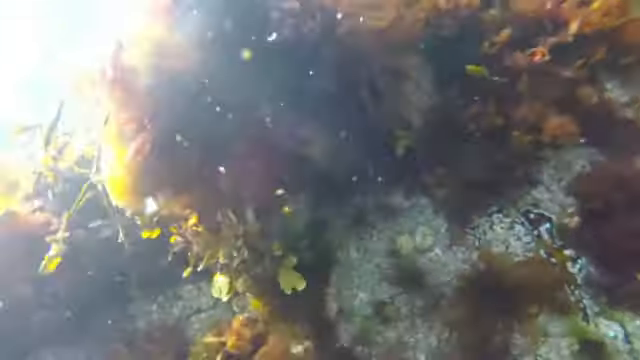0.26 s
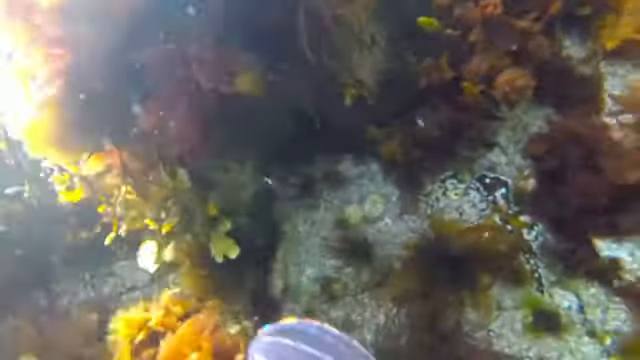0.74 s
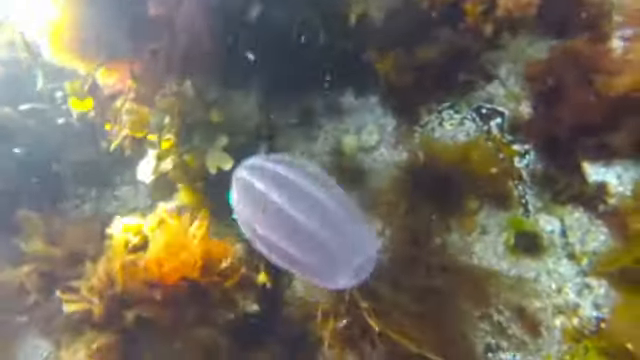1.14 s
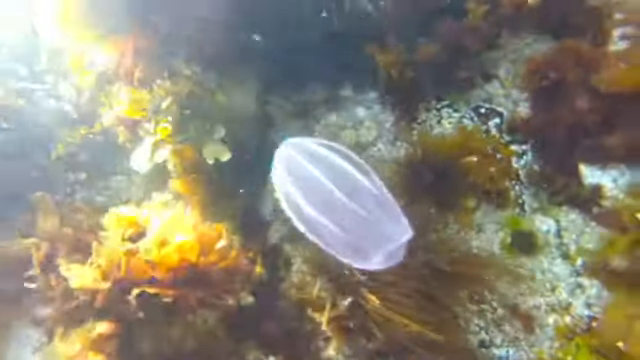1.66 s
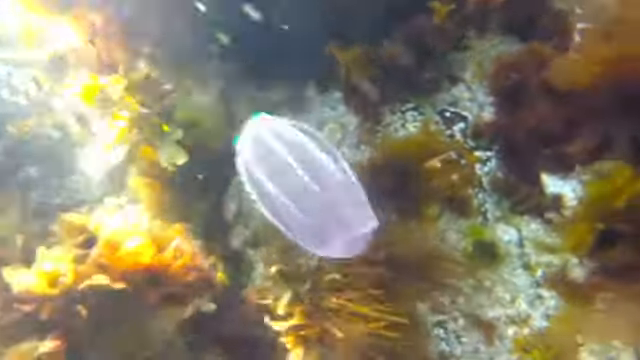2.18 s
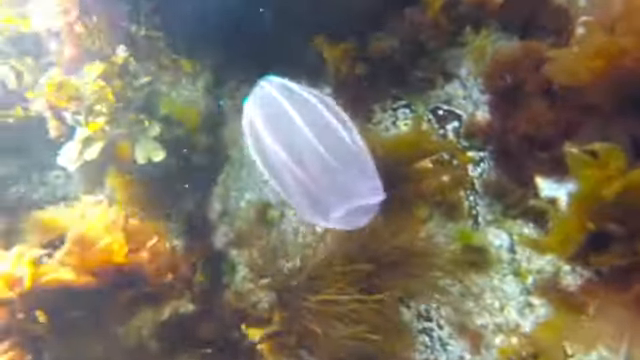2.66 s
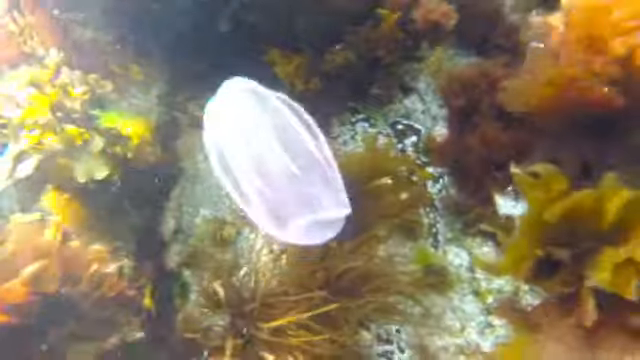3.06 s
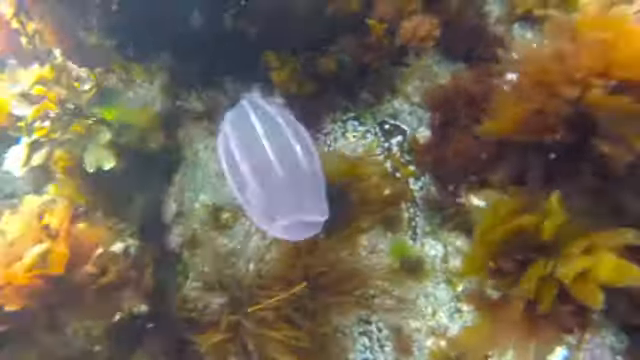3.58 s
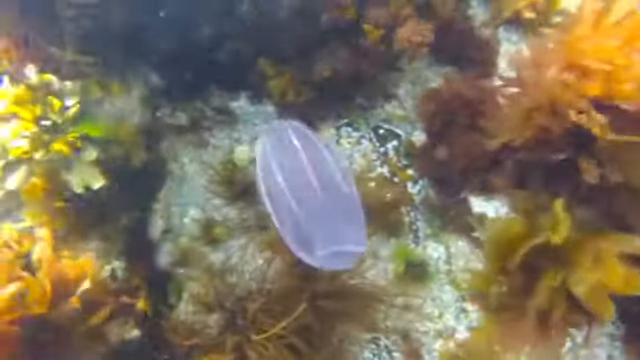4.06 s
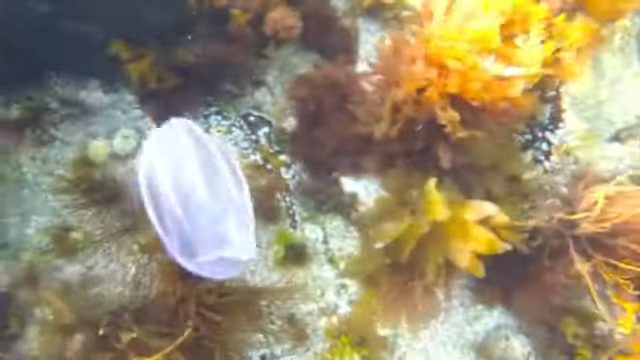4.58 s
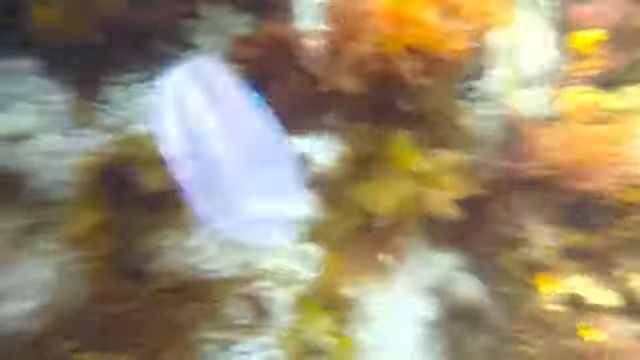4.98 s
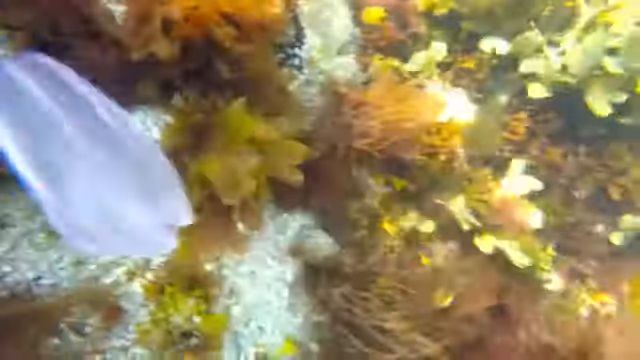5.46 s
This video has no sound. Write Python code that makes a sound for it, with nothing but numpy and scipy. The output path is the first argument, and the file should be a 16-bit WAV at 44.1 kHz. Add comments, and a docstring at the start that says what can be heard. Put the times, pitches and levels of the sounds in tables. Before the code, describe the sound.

Underwater, low water rumble and gurgles against a camera case, with fizzing bubbles, crisp ticks, small plops, and scraping bumps near the end.

```python
"""Drifting over weed in shallow sea

A camera in a waterproof case drifts over weed. Water sways and gurgles against the case as bands of noise and glugs.
Small waves leave a fizz of many tiny ringing grains, with single damped tones as ticks and plops.
The hand rubs the case, as noise through resonances; sinking tones are its bumps, short noise bursts are snaps.
Under it all lie a faint hiss and a thin, high whine, both of filtered noise."""
import sys
import numpy as np
from scipy import signal
from scipy.fft import rfft, irfft, next_fast_len
from scipy.io import wavfile
from scipy.ndimage import uniform_filter1d, map_coordinates

SR = 44100
rng = np.random.default_rng(int(sys.argv[2]) if len(sys.argv) > 2 else 0)


def wav_record(signal):
    """Record a signal, one row per channel, as 16-bit PCM in the file named by sys.argv[1]."""
    frames = np.transpose(np.atleast_2d(signal))
    bounded = np.clip(frames, -1, 1)
    # unit amplitude maps onto the largest positive 16-bit level
    quanta = np.round(bounded * 32767).astype(np.int16)
    wavfile.write(sys.argv[1], SR, quanta)


N = 252252

# Small waves that leave a cloud of bubbles. Each row: start in seconds, length in seconds, then the levels
# in dB of fizz, crackle, large bubbles and gurgle.
WAVE_CLOUDS = [(0.66, 1.17, -56, -57.5, -54.5, -43.5), (2.351, 0.086, -73, -82, -59.5, -46),
               (2.833, 0.32, -57, -61, -57.5, -60), (4.452, 0.04, -60.5, -63.5, -70, -56.5),
               (4.69, 0.15, -71, -73, -64, -67), (5.073, 0.17, -69, -63, -63, -38)]
FIZZ_THINNING_DB = 13.5  # loss over the life of a cloud
STRAY_SMALL_DB, STRAY_CRACKLE_DB = -79.5, -76  # bubbles between the waves


def amp(db):
    """Decibels to gain."""
    return 10 ** (np.asarray(db) / 20)


def unit(x):
    """Scale to rms 1."""
    return x / np.sqrt(np.mean(x ** 2) + 1e-20)


def clock():
    """The time of every sample in seconds."""
    return np.arange(N) / SR


def gains(rows):
    """One gain per sample for each dB column after the time."""
    seconds, *columns = np.transpose(rows)
    return [amp(np.interp(clock(), seconds, db)) for db in columns]


def wobble(rate):
    """A smooth random curve around zero, with rate knots a second."""
    knots = rng.standard_normal(int(N * rate / SR) + 4)
    return map_coordinates(knots, [clock() * rate])


def filtered(x, response):
    """x times a complex response of frequency."""
    size = next_fast_len(N + SR // 2)  # room for the filter to ring out
    spectrum = rfft(x, size) * response(np.fft.rfftfreq(size, 1 / SR))
    return irfft(spectrum, size)[:N]


def coloured(x, points):
    """x through a spectrum of (Hz, dB) points on a log axis, cut off outside them."""
    point_hz, db = np.transpose(points)

    def response(hz):
        return amp(np.interp(np.log(hz + 1), np.log(point_hz), db, -120, -120))

    return filtered(x, response)


def noise(points):
    """Coloured noise of rms 1."""
    return unit(coloured(rng.standard_normal(N), points))


def steady(x, span):
    """x with its swells slower than span seconds evened out, at rms 1."""
    size = max(int(span * SR), 2)
    power = uniform_filter1d(uniform_filter1d(x ** 2, size), size)
    return unit(x / np.sqrt(np.abs(power) + 1e-6))


def add(track, s, sound):
    """Mix a sound into the track at s seconds."""
    start = int(np.clip(round(s * SR), 0, N))
    track[start:start + len(sound)] += sound[:N - start]


def hiss():
    """A faint, even hiss: noise through one fixed spectrum."""
    # Each row: frequency in Hz, relative level in dB per Hz.
    hiss_colour = [(120, -43), (200, -10.5), (326, -9), (363, -10), (476, -10.5), (721, -7), (1050, -17),
                   (2330, -15), (3170, -19), (3470, -18), (3870, -16.5), (4310, -16.5), (7970, -24),
                   (10100, -24), (15000, -28)]
    return amp(-65) * noise(hiss_colour)


def whine(repeat_hz=23.28, loose=0.95):
    """A narrow, high, thin whine near 10 kHz: a repeating scrap of noise among loose noise."""
    # Each row: time in seconds, level in dB before the trim.
    whine_level = [(0, -71), (0.5, -72), (0.8, -73.5), (2.0, -74), (3.2, -78.5), (4.1, -83.5), (4.5, -74),
                   (5.3, -71), (5.72, -69)]
    # Each row: frequency in Hz, relative level in dB.
    whine_colour = [(7500, -44), (8450, -9), (8800, -25), (9200, -5), (9400, -14), (9750, -3.5),
                    (10130, 1.5), (10400, -3.5), (10700, -17.5), (11050, -17), (11800, -62)]
    phase = (clock() * repeat_hz) % 1
    scrap = rng.standard_normal(SR)
    repeating = scrap[(phase * SR / repeat_hz).astype(int)]
    level, = gains(whine_level)
    trim_db = 2.0
    return amp(trim_db) * level * unit(coloured(repeating + loose * rng.standard_normal(N), whine_colour))


def rubbing(bass_hz=300):
    """Uneven friction of the hand swells, fades and rings the resonances of the case."""
    # Slides of the hand. Each row: middle in seconds, half length in seconds, level in dB before the trim,
    # bass in dB against the rest, higher for a firmer press.
    slides = [(2.069, 0.021, -54.5, 7.5), (3.899, 0.0079, -48.5, -6), (3.965, 0.025, -60.5, 4),
              (4.294, 0.047, -53.5, 5.5), (4.853, 0.019, -52, -4), (4.961, 0.025, -42, 2.5),
              (5.010, 0.0093, -46, 12.5), (5.105, 0.11, -56, 11), (5.213, 0.004, -40.5, -14),
              (5.234, 0.0084, -43.5, 0), (5.253, 0.009, -43, -5), (5.442, 0.012, -50.5, 6.5),
              (5.4, 0.21, -63, -10), (5.568, 0.03, -42, -5.5), (5.634, 0.03, -39.5, 0.5)]
    # Resonances of the case. Each row: frequency in Hz, width in Hz, relative level in dB.
    resonances = [(88.2, 9.3, 23.5), (166.6, 11, 23), (261, 36, 7.5), (340.5, 50, 6), (667, 54.5, 11),
                  (785, 72, 9), (1300, 220, -2), (1710, 128, 8), (2030, 880, 0.5), (2840, 39, 4),
                  (3100, 250, -10.5)]
    # Friction before the case colours it. Each row: frequency in Hz, relative level in dB.
    friction_colour = [(30, -54), (100, 1), (2800, -3.5), (3800, -12), (5500, -10.5), (7000, -26),
                       (10000, -35)]

    strokes = np.array([amp(db) ** 2 * np.exp(-((clock() - middle) / half) ** 2)
                        for middle, half, db, _ in slides])  # power of each slide
    slide = np.sqrt(strokes.sum(axis=0))
    press = np.sqrt(amp([row[-1] for row in slides]) ** 2 @ strokes)
    friction = steady(noise(friction_colour) * amp(2.9 * wobble(300)), span=0.036)
    bass = filtered(friction, lambda f: 1 / (1 + (f / bass_hz) ** 4))

    def case_response(f):
        total = 0
        for k, (hz, width, db) in enumerate(resonances):
            sign = (-1) ** k  # neighbours in opposite phase
            total = total + sign * amp(db) * 1j * f * width / (hz * hz - f * f + 1j * f * width)
        return total

    rub = filtered((friction - bass) * slide + bass * press, case_response)
    trim_db = 6.5
    return amp(trim_db) * rub / np.std(filtered(friction, case_response))


def knocks():
    """Something taps the case: each knock starts bright and sinks at once to a hollow note."""
    # Each row: start in seconds, peak in dB, first pitch in Hz, settled pitch in Hz, fall time in seconds,
    # decay by 60 dB in seconds.
    taps = [(0.318, -32, 890, 81, 0.0023, 0.12), (0.824, -27.5, 120, 70, 0.0042, 0.12),
            (4.051, -30, 143, 34.3, 0.018, 0.24), (4.386, -27.5, 3330, 740, 0.00168, 0.02),
            (5.238, -20.5, 122, 43.4, 0.0083, 0.16)]
    track, t = np.zeros(N), np.arange(SR // 4) / SR
    for s, db, first_hz, settled_hz, fall, t60 in taps:
        hz = settled_hz + (first_hz - settled_hz) * np.exp(-(t / fall) ** 2.9)
        attack = (1 - np.exp(-t / (1.8 * fall))) ** 2
        shape = attack * np.exp(-np.log(1000) * t / t60)
        tone = np.sin(2 * np.pi * np.cumsum(hz) / SR)
        add(track, s, amp(db) * shape / shape.max() * tone)
    return track


def snaps():
    """Very short, dry cracks among the weed and the stones: decaying bursts of noise."""
    # Each row: start in seconds, level in dB before colour and trim.
    cracks = [(0.554, -48.5), (1.566, -43.5), (1.731, -51), (3.844, -42), (4.436, -49), (5.079, -46.5),
              (5.104, -44), (5.155, -44.5)]
    # Each row: frequency in Hz, gain in dB.
    crack_colour = [(600, 1), (1500, -18), (2400, -6), (3300, 4), (4000, -6), (5500, -8), (6500, -12),
                    (8000, -26)]
    track, t = np.zeros(N), np.arange(SR // 50) / SR
    for s, db in cracks:
        add(track, s, amp(db) * rng.standard_normal(len(t)) * np.exp(-t / 0.003))
    trim_db = 7.5
    return amp(trim_db) * coloured(track, crack_colour)


def scatter(x, t60=0.071, wet_db=-12):
    """Rocks and the surface close by blur each click with a very short tail that drifts between two patterns."""
    t = np.arange(SR // 10) / SR
    tails = rng.standard_normal((2, len(t))) * np.exp(-np.log(1000) * t / t60)
    first, second = (signal.fftconvolve(x, tail / np.linalg.norm(tail))[:N] for tail in tails)
    drift = 2 * np.pi * wobble(2.024)
    return x + amp(wet_db) * (np.cos(drift) * first + np.sin(drift) * second)


def clouds(levels_db, thinning_db, rows=WAVE_CLOUDS):
    """Gain of the bubble clouds: each builds up to its start, holds, thins out by its end and clears."""
    attack_s, release_s = 0.098, 0.03  # attack of a cloud one second long
    attack_grows = 0.21  # longer clouds build up more slowly: power of the length in seconds
    hold = 0.14  # share of its life at full strength
    t, power = clock(), np.zeros(N)
    for (start, length, *_), db in zip(rows, levels_db):
        early = np.maximum(start - t, 0) / (attack_s * length ** attack_grows)
        late = np.maximum(t - start - length, 0) / release_s
        thinned = np.clip(((t - start) / length - hold) / (1 - hold), 0, 1)
        power += (amp(db - thinning_db * thinned) * np.exp(-early - late)) ** 2
    return np.sqrt(power)


def water():
    """Water pushes the case to and fro, gurgles more in strong flow and under waves, and now and then glugs."""
    # Push of the water on the case. Each row: time in seconds, strength in dB.
    push = [(0.0, -31.5), (1.22, -36), (1.36, -44.5), (1.73, -28.5), (1.79, -36), (2.25, -41), (2.33, -30),
            (2.44, -48), (2.54, -33), (3.35, -44), (3.48, -31), (3.63, -44), (3.78, -30.5), (3.91, -42.5),
            (3.98, -29), (4.03, -50), (4.06, -29), (4.3, -36), (4.46, -29), (4.59, -38.5), (5.21, -24.5),
            (5.7, -27.5)]
    # Both colours. Each row: frequency in Hz, relative level in dB per Hz.
    sway_colour = [(10, -49), (18, -4), (24, 3), (30, -1.5), (38, -11), (48, -24), (70, -34), (130, -61),
                   (300, -120)]
    gurgle_colour = [(30, -42), (50, 0), (68, 2.5), (85, 8), (102, -3), (130, -13), (165, -13),
                     (210, -25.5), (400, -36.5), (900, -120)]
    # Deep glugs. Each row: middle in seconds, half length in seconds, peak in dB, pitch in Hz.
    glug_rows = [(0.448, 0.031, -39, 81), (2.335, 0.027, -42.5, 75), (2.637, 0.035, -35.5, 72),
                 (2.834, 0.038, -33.5, 92.4), (4.392, 0.029, -34, 83.6), (4.89, 0.042, -33.5, 61.6),
                 (5.04, 0.026, -25, 82), (5.107, 0.035, -26.5, 87), (5.696, 0.027, -30.5, 83.8)]
    calm_db, calm_gurgle_db = -33, -50.5  # a usual flow and its gurgle
    gurgle_grows = 1.06  # dB of gurgle per dB of flow
    still_gurgle_db = -54.5  # gurgle in still water
    eddy_db, eddy_rate = 1.5, 9  # eddies make the gurgle uneven: depth, eddies a second

    flow, = gains(push)
    stirred = amp(calm_gurgle_db) * (flow / amp(calm_db)) ** gurgle_grows
    churned = clouds([row[-1] for row in WAVE_CLOUDS], thinning_db=2.5)
    gurgle_gain = np.sqrt(stirred ** 2 + churned ** 2 + amp(still_gurgle_db) ** 2)
    gurgle_gain = gurgle_gain * amp(eddy_db * wobble(eddy_rate))
    sway = amp(1) * flow * steady(noise(sway_colour), span=0.026)  # 1 dB over the flow
    gurgle = gurgle_gain * steady(noise(gurgle_colour), span=0.028)
    t, glugs = clock(), np.zeros(N)
    for middle, half, db, hz in glug_rows:
        swell = np.exp(-((t - middle) / half) ** 2)
        glugs += amp(db) * swell * np.sin(2 * np.pi * hz * (t - middle))
    return sway + gurgle + glugs


def swarm(rate, pitch_hz, spread, cycles, size_db):
    """Rate bubbles a second, each ringing for a few cycles at its own pitch and size."""
    count = int(rate * N / SR)
    when, pitch, size = rng.random((count, 3)).T
    hz = pitch_hz * np.exp(spread * (2 * pitch - 1))
    age = np.arange(int(5 * cycles * SR / pitch_hz))  # in samples
    turns = hz[:, None] * age / SR
    strength = amp(-size_db * np.log(np.maximum(size, .005)))  # many weak bubbles, few strong ones
    shape = np.exp(-turns / cycles) * (1 - np.exp(-turns))
    grains = strength[:, None] * np.sin(2 * np.pi * turns) * shape
    index = (when * N).astype(int)[:, None] + age
    return np.bincount(index.ravel(), grains.ravel(), N)[:N]


def fizz():
    """Small waves leave clouds of bubbles, with sprays of the finest; a few others keep bursting in between."""
    # Colours of large, small and finest bubbles. Each row: frequency in Hz, relative gain in dB.
    large_colour = [(150, -37), (300, -14), (550, -11.5), (720, 0), (850, 2.5), (1050, -9.5), (1400, -9.5),
                    (2200, -48)]
    small_colour = [(900, 11), (1250, -21.5), (1600, -10), (1950, -2), (2300, -5.5), (2750, -1.5),
                    (3200, 6.5), (3500, 4.5), (3800, -12), (4050, -35), (4900, -6), (7000, -43)]
    fine_colour = [(3000, -23), (4050, 6), (4400, -19.5), (4950, -21), (5450, 6), (6000, -9), (6550, 0.5),
                   (7200, -35), (9000, -18)]
    # Sprays of the finest bubbles. Each row: start in seconds, length in seconds, level in dB.
    sprays = [(0.885, 0.95, -67), (2.807, 0.12, -67), (5.07, 0.12, -73)]
    large_thinning_db, fine_thinning_db, stray_large_db = 10, 2.5, -74
    clump_db, clump_rate = 1.83, 45  # bubbles burst in clumps: depth, clumps a second

    _, _, fizz_db, crackle_db, large_db, _ = np.transpose(WAVE_CLOUDS)
    clumps = amp(clump_db * wobble(clump_rate))
    large_gain = np.hypot(clumps * clouds(large_db, large_thinning_db), amp(stray_large_db))
    far_gain = np.hypot(clumps * clouds(fizz_db, FIZZ_THINNING_DB), amp(STRAY_SMALL_DB))
    near_gain = np.hypot(clouds(crackle_db, thinning_db=12), amp(STRAY_CRACKLE_DB))
    fine_gain = clumps * clouds([row[-1] for row in sprays], fine_thinning_db, sprays)
    large = coloured(swarm(rate=900, pitch_hz=776, spread=0.76, cycles=1.9, size_db=3.5), large_colour)
    far = coloured(swarm(rate=1500, pitch_hz=2415, spread=0.74, cycles=1.4, size_db=2.5), small_colour)
    # nearer bubbles ring longer and stand out of the wash as crackle
    near = coloured(swarm(rate=300, pitch_hz=3120, spread=0.25, cycles=8.3, size_db=6), small_colour)
    fine = coloured(swarm(rate=600, pitch_hz=5850, spread=0.42, cycles=2.6, size_db=3), fine_colour)
    return (large_gain * steady(large, span=0.051) + far_gain * steady(far, span=0.04)
            + near_gain * steady(near, span=0.16) + fine_gain * steady(fine, span=0.21))


def ring(hz, t60, attack_cycles, rise):
    """A damped oscillation under an envelope of peak 1, whose pitch rises by a share as it dies."""
    t = np.arange(int(t60 * SR) + 64) / SR
    shape = (1 - np.exp(-t * hz / attack_cycles)) * np.exp(-np.log(1000) * t / t60)
    return shape / shape.max() * np.sin(2 * np.pi * hz * t * (1 + rise * t / t60 / 2))


def chance_bubbles(count, pitch_hz, spread, over_db):
    """Rows (s, dB, Hz) of single bubbles at random times, over_db above the level set for the fizz then."""
    place, pitch = rng.random((count, 2)).T
    when = (np.arange(count) + place) / count * N / SR  # one in each equal share of the time
    fizz_gain = clouds([row[2] for row in WAVE_CLOUDS], FIZZ_THINNING_DB)
    around = np.hypot(fizz_gain, amp(STRAY_CRACKLE_DB) + amp(STRAY_SMALL_DB))
    db = 20 * np.log10(np.interp(when, clock(), around)) + over_db
    return list(zip(when, db, pitch_hz * np.exp(spread * (2 * pitch - 1))))


def bubbles():
    """Single near bubbles ring as they pinch off: small ones tick briefly, large ones plop and ring longer."""
    # The loudest ones close by. Each row: start in seconds, peak in dB before the trim, pitch in Hz.
    near_bubbles = [(0.262, -47, 730), (0.434, -48, 835), (0.497, -53.5, 2900), (0.554, -40.5, 2800),
                    (0.618, -38, 3110), (0.651, -36, 2850), (0.697, -42, 3130), (0.780, -40, 3050),
                    (1.029, -42, 860), (1.034, -40, 3070), (1.305, -43.5, 3100), (1.407, -41, 3160),
                    (1.490, -36, 3360), (1.566, -42, 3300), (1.741, -41, 3300), (1.838, -49.5, 777),
                    (2.364, -43.5, 745), (2.650, -40.5, 3170), (2.724, -46.5, 2520), (2.753, -39, 830),
                    (2.777, -44, 3420), (2.914, -41.5, 2070), (3.076, -47, 683), (3.103, -50, 2000),
                    (3.229, -53, 924), (3.844, -46, 2320), (3.898, -43, 2070), (4.369, -47.5, 3070),
                    (4.464, -47, 1820), (4.474, -47, 3360), (4.616, -44.5, 2705), (4.628, -40.5, 729),
                    (5.046, -37.5, 3080), (5.074, -36, 3130), (5.102, -42, 2340), (5.17, -43, 3150),
                    (5.187, -40, 1460)]
    ring_s, ring_falls = 0.044, 0.78  # 60 dB decay at 1 kHz; power of the pitch by which it shortens
    ticks = chance_bubbles(count=36, pitch_hz=2980, spread=0.153, over_db=10.5)
    plops = chance_bubbles(count=20, pitch_hz=745, spread=0.345, over_db=5.5)
    track = np.zeros(N)
    for s, db, hz in near_bubbles + ticks + plops:
        t60 = ring_s / (hz / 1000) ** ring_falls
        add(track, s, amp(db) * ring(hz, t60, attack_cycles=1.37, rise=0.057))
    trim_db = -0.5
    return amp(trim_db) * track


def scene():
    """All sources over the steady hiss; only the clicks are blurred by the surroundings."""
    clicks = scatter(bubbles() + snaps() + knocks())
    return (hiss() + whine() + rubbing() + water() + fizz() + clicks)[None]


def record(dry):
    """The camera keeps nothing above its band limit."""
    top_hz = 15280
    return filtered(dry[0], lambda hz: hz < top_hz)[None]


dry = scene()
out = record(dry)
wav_record(out)
```